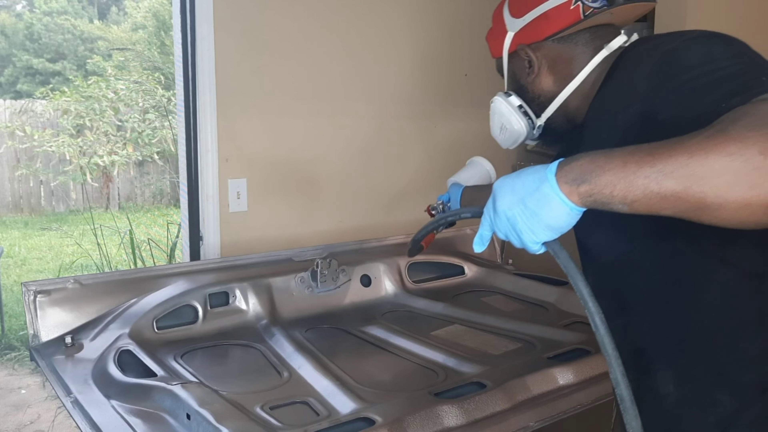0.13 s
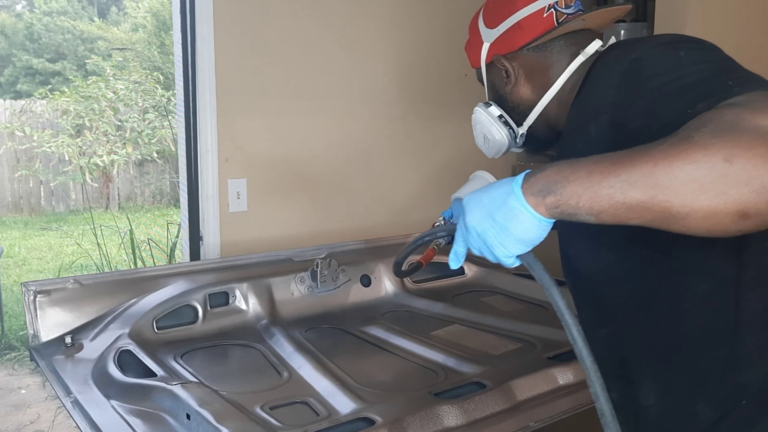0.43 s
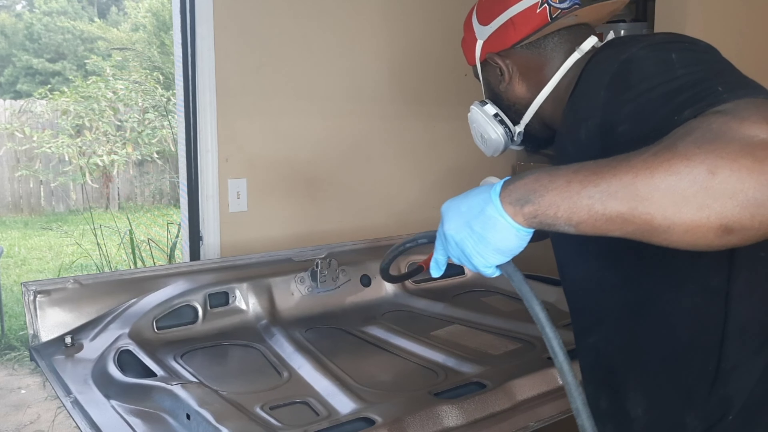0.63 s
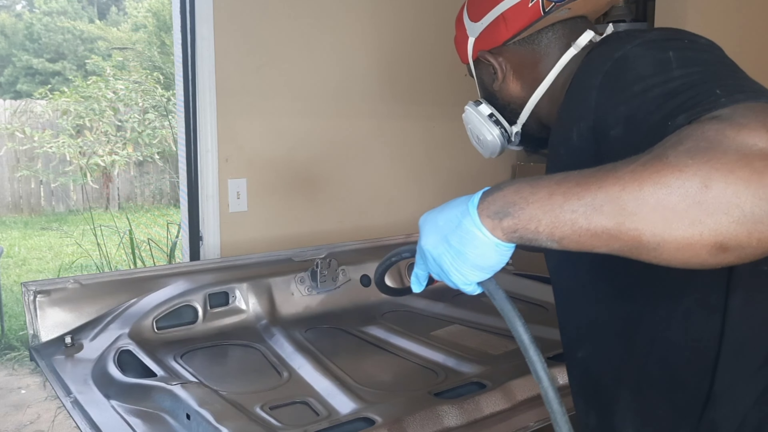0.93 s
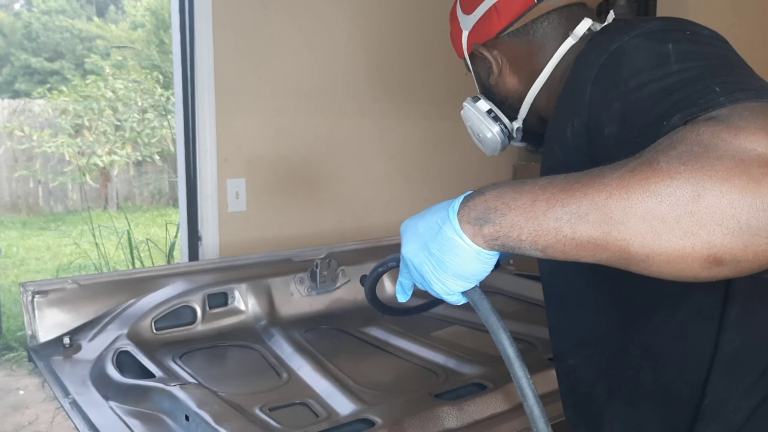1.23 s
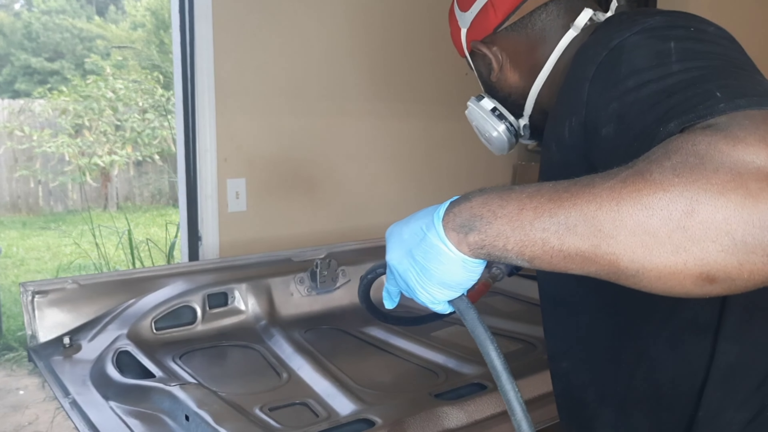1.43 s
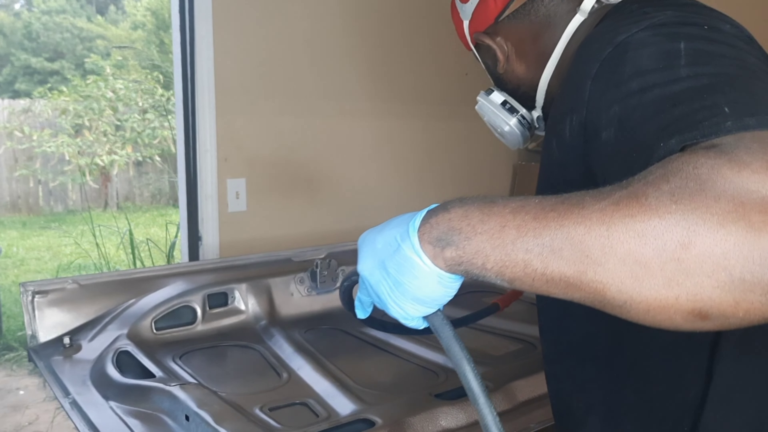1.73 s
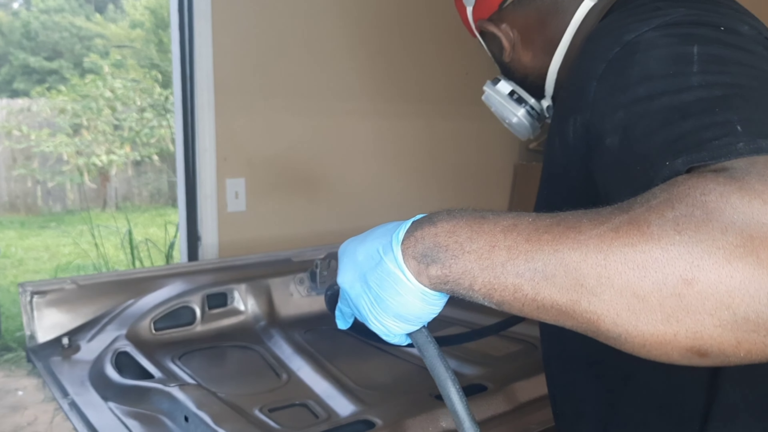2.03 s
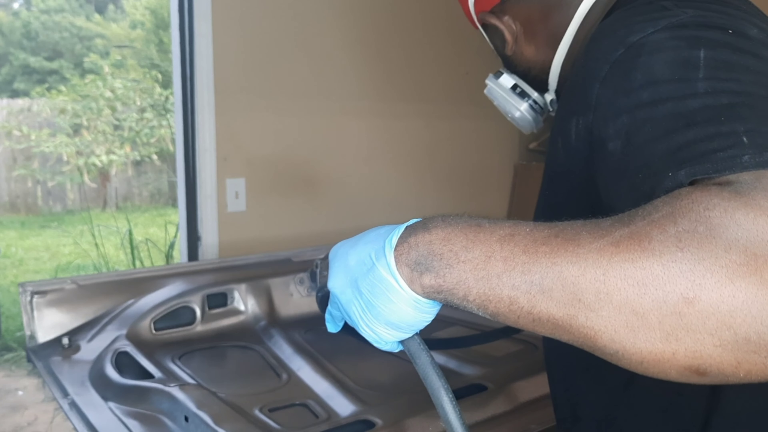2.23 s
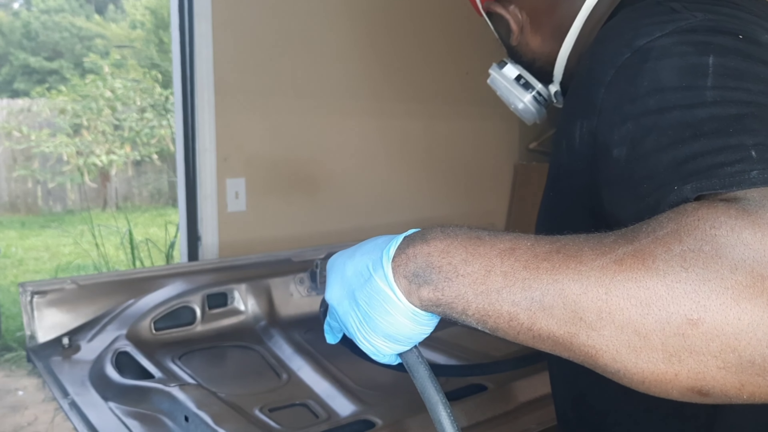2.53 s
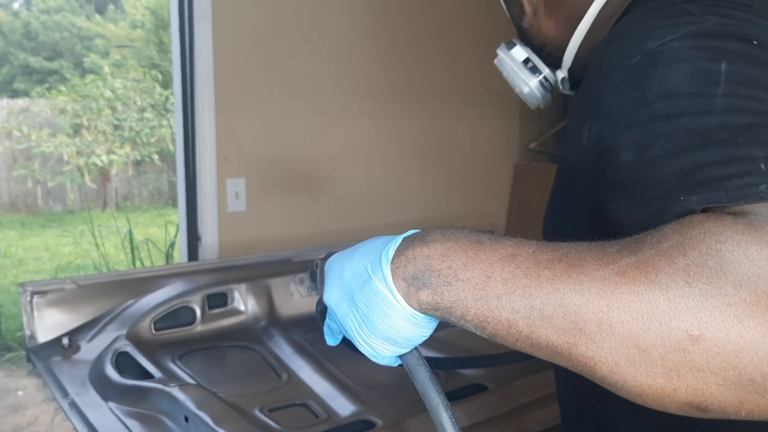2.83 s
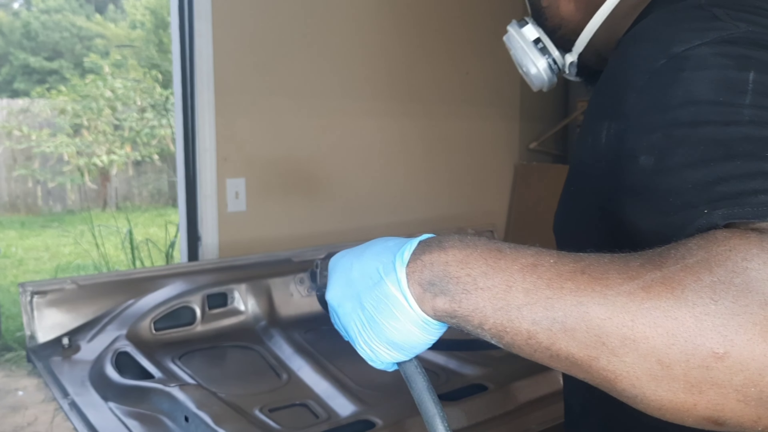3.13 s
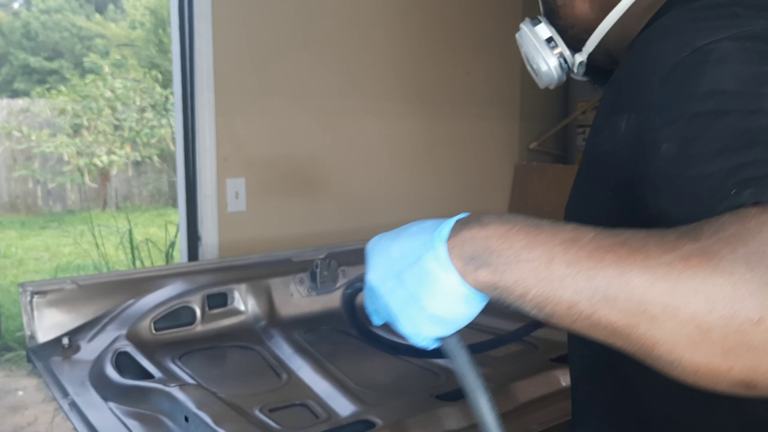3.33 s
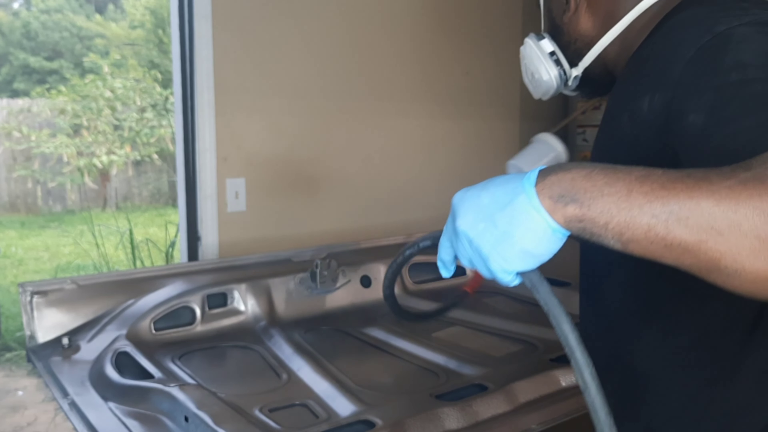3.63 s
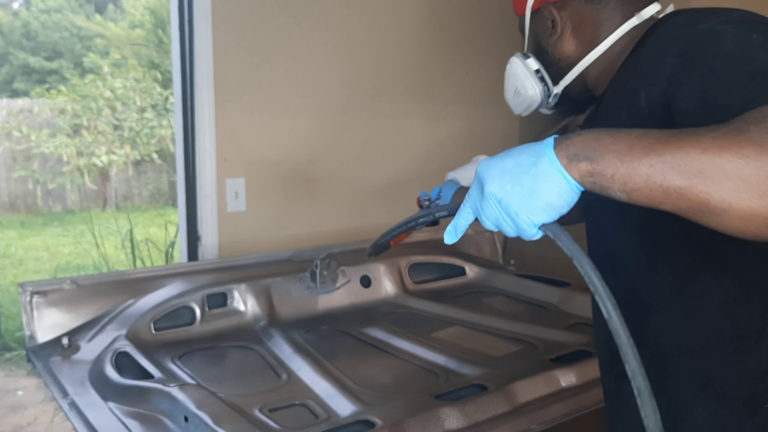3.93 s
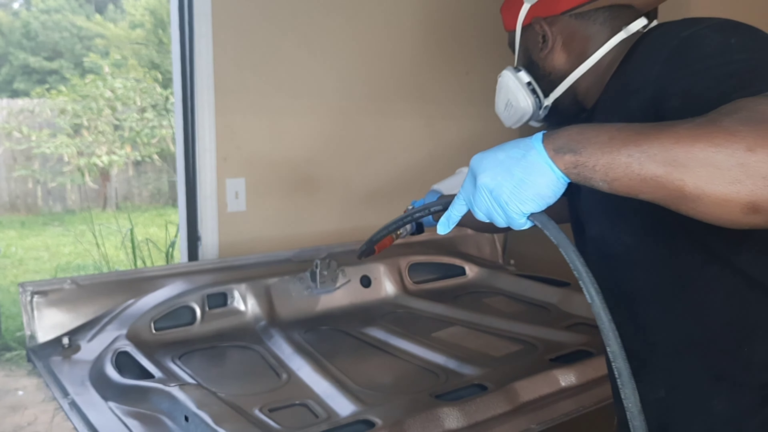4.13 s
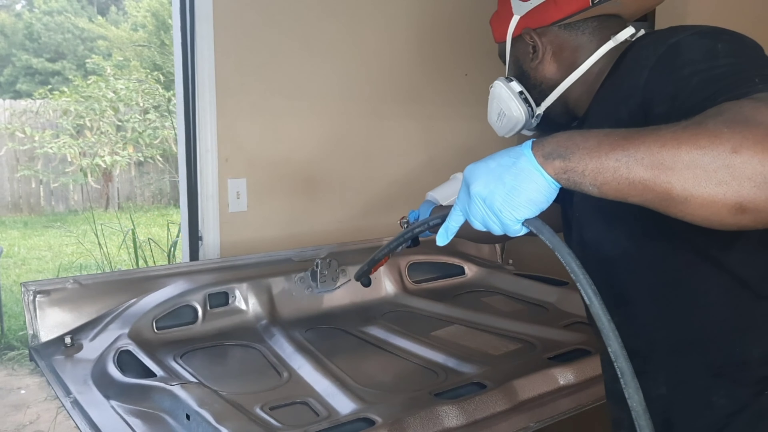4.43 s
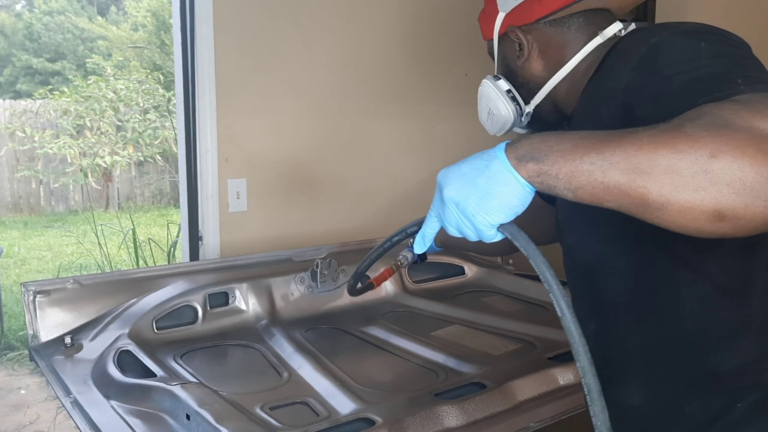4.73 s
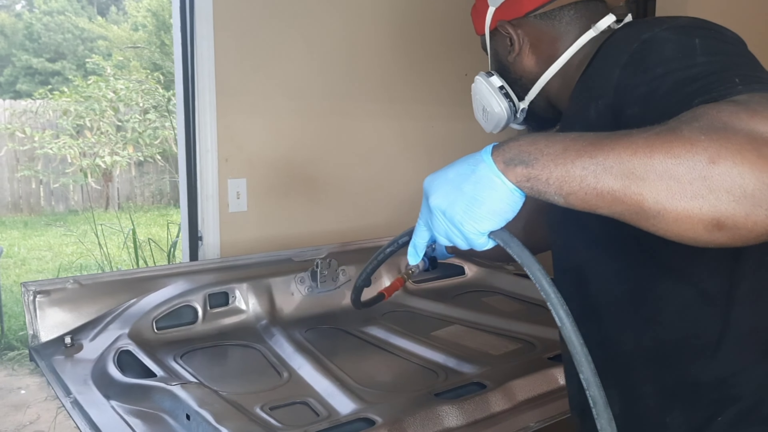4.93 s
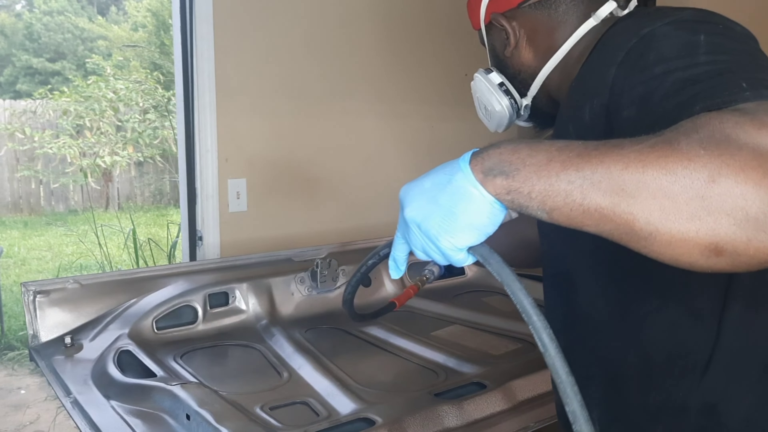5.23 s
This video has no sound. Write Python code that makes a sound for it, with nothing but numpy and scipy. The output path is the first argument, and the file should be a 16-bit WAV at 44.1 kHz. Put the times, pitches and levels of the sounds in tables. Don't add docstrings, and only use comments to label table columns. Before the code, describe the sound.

A belt-driven air compressor clatters and drones steadily in an open garage while a nearby spray gun hisses in two long bright passes.

```python
import sys
import numpy as np
from scipy import signal
from scipy.fft import rfft, irfft, next_fast_len
from scipy.io import wavfile

SR = 44100
rng = np.random.default_rng(int(sys.argv[2]) if len(sys.argv) > 2 else 0)


def voltage_ratio(decibels):
    exponent = np.asarray(decibels, float) / 20
    return 10 ** exponent


def master(y):
    cut = np.clip(np.atleast_2d(y).T, -1, 1)
    pcm = np.round(cut * 32767)
    wavfile.write(sys.argv[1], SR, pcm.astype(np.int16))


N = 429975

CRANK_HZ = 19.6140
CUTOFF_HZ = 15730

# opens_s, shuts_s, jet_db, burst_db
TRIGGER_PULLS = [
    (-0.1, 2.745, 1.1, -7),
    (3.999, 7.19, 1, 1.5),
]


def at_hz(points, hz):
    grid, *columns = np.transpose(points)
    return np.array([np.interp(np.log(hz + 1), np.log(grid), column) for column in columns])


def drift(rate_hz):
    smoothing = np.exp(-200 * np.pi * rate_hz / SR)
    noise = rng.standard_normal(N // 100 + 2002)
    slow = signal.lfilter([1], [1, -2 * smoothing, smoothing ** 2], noise)[2000:]
    return np.interp(np.arange(N) / 100, np.arange(len(slow)), slow / slow.std())


def air(spectrum, peaks, ripple_db, splits):
    size = next_fast_len(N)
    hz = np.fft.rfftfreq(size, 1 / SR)
    left_db, right_db, alike = at_hz(spectrum, hz)
    alike = np.clip(alike, 0, 1)
    mid, side = rfft(rng.standard_normal((2, size)))
    pair = np.sqrt(1 + alike) * mid + np.sqrt(1 - alike) * side * [[1], [-1]]

    ripple = [np.interp(hz, np.arange(400) * 60.0, row) for row in rng.standard_normal((2, 400))]
    level_db = np.array([left_db, right_db]) + ripple_db * np.array(ripple) * (hz > 600)
    for centre, width, *peak_db in peaks:
        level_db = level_db + np.outer(peak_db, 1 / (1 + (2 * (hz - centre) / width) ** 2))
    coloured = pair * voltage_ratio(level_db) * np.sqrt(SR / 4)

    place = np.interp(np.log(hz + 1), np.log(splits), np.arange(len(splits)))
    bands = []
    for k in range(len(splits)):
        share = np.sqrt(np.clip(1 - abs(place - k), 0, 1))
        bands.append(irfft(coloured * share, size)[:, :N])
    return bands


def loudness_beats(lines):
    power = abs(np.fft.ifft(lines, 64)) ** 2
    return rfft(power)[:, 1:] / power.sum(axis=1, keepdims=True)


def beat_phases(lines, count=2000):
    swells = [(21, 0.01, 0.44, 0.44, 0.33), (29, 0.28, 0.77, 0.1, 0.38), (37, 0.37, 0.63, 0.14, 0.13),
              (43, 0.42, 0.64, 0.25, 0.21), (48, 0.55, 0.54, 0.29, 0.01), (53, 0.25, 0.12, 0.33, 0.44),
              (59, 0.43, 0.73, 0.12, 0.25), (66, 0.05, 0.83, 0.53, 0.37), (73, 0.1, 0.78, 0.07, 0.47),
              (81, 0.12, 0.89, 0.36, 0.1), (104, 0.27, 0.78, 0.12, 0.49)]
    phase, low = rng.uniform(0, 2 * np.pi, len(lines)), 13
    for top, once, once_at, twice, twice_at in swells:
        near = max(top - 24, 13)
        tries = np.tile(phase[near:top], (count, 1))
        tries[:, low - near:] = rng.uniform(0, 2 * np.pi, (count, top - low))
        trial = lines[near:top] * np.exp(1j * tries)
        wanted = np.array([once, twice]) * np.exp(-2j * np.pi * np.array([once_at, 2 * twice_at]))
        miss = (abs(loudness_beats(trial[:, low - near:])[:, :2] - wanted) ** 2).sum(axis=1)
        rattle = (abs(loudness_beats(trial)[:, 2:]) ** 2).sum(axis=1)
        phase[near:top] = tries[np.argmin(miss + .12 * rattle)]
        low = top
    return phase


def crank(count=6, size=2 ** 14):
    # order, left_db,
    # right_db, left_lead_rad
    strong_orders = [(2, -66, -67, -0.0), (3, -56, -56, 0.0), (4, -48, -48, -0.3), (5, -65, -70, 0.0),
                     (6, -52, -46, -0.2), (7, -68, -67, -0.2), (8, -51, -52, -0.1), (9, -73, -77, -0.0),
                     (10, -69, -72, 0.5), (11, -64, -67, 0.0), (12, -50, -52, 0.2), (13, -57, -63, 0.6),
                     (14, -49, -56, -1.8), (15, -51, -57, 0.1), (16, -44, -41, -0.2), (17, -56, -68, -0.1),
                     (18, -34, -36, -0.2), (19, -63, -90, 1.0), (20, -49, -52, -0.1), (21, -54, -54, -0.2),
                     (22, -51, -52, -0.6), (23, -49, -52, -0.5), (24, -44, -49, 0.3), (25, -36, -44, 0.2),
                     (26, -41, -51, 2.6), (27, -67, -57, -2.1), (28, -52, -56, -1.0), (29, -54, -53, 0.1),
                     (30, -48, -51, -1.6), (31, -48, -52, 2.4),
                     (32, -43, -46, -0.7), (33, -48, -49, -0.7), (34, -46, -49, -1.4), (35, -49, -54, -1.2),
                   (36, -51, -37, 1.0), (37, -49, -51, -0.9), (38, -36, -37, -0.9), (39, -41, -45, -2.1),
                   (40, -38, -43, -1.4), (41, -38, -48, -1.9), (42, -48, -45, -2.0), (43, -53, -53, 1.3),
                   (44, -46, -39, 1.1), (45, -33, -36, -0.8), (46, -36, -37, 0.0), (47, -41, -46, -0.8),
                   (48, -37, -43, -0.6), (49, -28, -38, -1.0), (50, -29, -44, 1.1), (51, -42, -53, 3.0),
                   (52, -48, -41, 2.2), (53, -46, -50, -1.5), (54, -35, -47, -2.0), (55, -41, -45, 1.9),
                   (56, -40, -40, -1.9), (57, -45, -54, 0.2), (58, -44, -43, 3.1), (59, -43, -44, -1.6),
                   (60, -41, -43, -2.3), (61, -38, -41, -2.1),
                     (62, -38, -48, -1.5), (63, -34, -46, -2.7), (64, -70, -44, -2.0), (65, -44, -38, -1.1),
                   (66, -47, -46, 1.9), (67, -36, -39, -2.5), (68, -46, -55, -2.2), (69, -46, -51, -2.9),
                   (70, -38, -45, -2.5), (71, -58, -45, 0.9), (72, -44, -47, 0.4), (74, -36, -42, 2.7),
                   (75, -45, -51, 2.5), (77, -39, -45, 1.5), (83, -44, -55, -0.5), (85, -45, -55, 0.8),
                   (87, -44, -47, -2.3), (89, -47, -47, -1.9), (91, -48, -55, -3.0), (96, -45, -57, -0.6),
                   (97, -48, -49, 1.6), (101, -50, -54, -2.3), (102, -56, -48, 2.5), (115, -51, -56, 0.6),
                   (117, -48, -54, 0.9), (118, -49, -56, 0.4), (119, -51, -47, 1.3), (125, -52, -62, 1.2),
                   (129, -43, -51, -0.3), (133, -50, -61, -0.5)]
    # pitch_hz, left_db, right_db
    knock_levels = [(644, -39.5, -42.5), (1010, -45.5, -45), (1310, -53, -56), (1540, -58.5, -59.5),
                    (1950, -54, -51), (2440, -54.5, -63.5), (3160, -69, -85), (4130, -62.5, -62),
                    (5700, -73, -67), (8100, -70, -66.5), (10100, -70.5, -85), (12000, -75.7, -77.5),
                    (15000, -77, -77)]
    # time_s, level_db
    body_shade = [
        (0, -4),
        (1, -2),
        (5, -1),
        (6.2, -0.5),
        (9.75, 0),
    ]
    shaded_order = 49

    orders = np.arange(size // 2 + 1)
    order_hz = orders * CRANK_HZ
    scatter = rng.exponential(1, (2, len(orders))) ** 0.65
    strength = voltage_ratio(at_hz(knock_levels, order_hz)) * scatter * (order_hz < CUTOFF_HZ)
    strength[:, :2] = 0
    lead = rng.uniform(0, 2 * np.pi, len(orders))
    for order, left_db, right_db, rad in strong_orders:
        strength[:, round(order)] = voltage_ratio(np.array([left_db, right_db]))
        lead[round(order)] = rad
    lines = strength * np.exp(1j * np.array([lead, 0 * lead]))
    phase = beat_phases(lines.sum(axis=0))

    turns = CRANK_HZ * np.arange(N) / SR + .0005 * drift(0.33)
    group = rng.integers(0, count, len(orders))
    group[shaded_order] = count
    shade_db = np.interp(np.arange(N) / SR, *np.transpose(body_shade))
    out = 0
    for k in range(count + 1):
        turn = irfft(lines * np.exp(1j * phase) * (group == k), size) * size / np.sqrt(2)
        at = ((turns + 0.00014 * drift(1.5)) % 1 * size).astype(int) % size
        out = out + voltage_ratio(0.86 * drift(0.93) + shade_db * (k == count)) * turn[:, at]
    return out


def rush():
    # pitch_hz, left_db_per_hz, right_db_per_hz, left_right_likeness (0-1)
    rush_colour = [(40, -80, -86, 0.66), (80, -74.5, -70.6, 0.9), (139, -76, -80, 0.7),
                   (200, -65.5, -77, 0.9), (264, -66.5, -71, 0.9), (350, -68, -66.5, 0.83),
                   (690, -67, -67.5, 0.27), (940, -72, -68.5, 0), (1380, -72.5, -72, 0),
                   (2950, -76, -75.5, 0.09), (5370, -83.5, -80.5, 0), (9500, -80, -85.5, 0.11),
                   (11600, -81, -85, 0), (15000, -86.5, -86, -0.09)]
    # pitch_hz, width_hz, left_db, right_db
    rush_peaks = [(202, 21, -10.5, -16), (326, 5.7, 15, 8.5), (511, 41, 12, 6.5), (1316, 51, 8, 13),
                  (1560, 130, -2.5, -3), (3400, 190, -2, -2), (2170, 220, -3, -4), (2330, 114, 7.5, 9),
                  (2540, 120, 1, 2), (655, 40, 6, 7), (2690, 290, -1.5, 0.5), (834, 79, -6, -12),
                  (3830, 330, 3.5, -1.5), (6400, 240, 3.5, 4.5), (6890, 320, -5, 6), (8460, 500, -0.5, 7.5),
                  (9600, 230, 6, 3), (10400, 530, 3.5, 0), (12500, 300, 5, 4), (12850, 250, 4, 4),
                  (13480, 200, 6, 4), (15550, 300, -1, 2)]
    slow_swell_hz, slow_swell_start_rad = 2.28, 4.6
    bands = air(rush_colour, rush_peaks, ripple_db=3.5, splits=[600, 2200, 5000, 11000])
    angle = 2 * np.pi * slow_swell_hz * np.arange(N) / SR + slow_swell_start_rad + .3 * drift(0.38)
    slow_swell = np.cos(angle) + 0.51 * drift(6.9)
    swell_db = [0.1, 0.48, 0.99, 0.32]
    return sum(band * voltage_ratio(db * slow_swell + 0.27 * drift(19.0)) for band, db in zip(bands, swell_db))


def motor():
    # pitch_hz, level_db
    motor_tones = [(57.7, -65), (84.0, -63), (120.0, -58), (140.0, -64), (154.0, -58), (159.1, -63),
                   (168.0, -64), (173.0, -63), (182.0, -60), (238.0, -55), (240.0, -53), (266.0, -59),
                   (280.0, -58), (500.2, -50), (3607, -59), (3881, -59), (9647, -59), (13464, -67)]
    out = 0
    waver_s = np.arange(N) / SR + 3e-5 * drift(1.7)
    for (hz, db), start in zip(motor_tones, rng.uniform(0, 2 * np.pi, len(motor_tones))):
        side_shift = np.array([[0], [hz / 2500]])
        out = out + np.sqrt(2) * voltage_ratio(db) * np.cos(2 * np.pi * hz * waver_s + start + side_shift)
    return out


def pull_strengths():
    rise_s = 0.0077
    jet_sag_db_per_s, shut_s, tail_db, tail_db_per_s = 0.7, 0.027, -19, 210
    burst_hold_s, burst_hold_sag_db, burst_fall_db_per_s = .036, 4.5, 230
    t, jet, burst = np.arange(N) / SR, 0, 0
    for opens, shuts, jet_db, burst_db in TRIGGER_PULLS:
        opening = np.clip((t - opens) / rise_s, 0, 1) ** 2
        closing_db = tail_db * np.clip((t - shuts) / shut_s, 0, 1)
        room_db = -tail_db_per_s * np.maximum(t - shuts - shut_s, 0)
        sag_db = jet_sag_db_per_s * (t - opens)
        jet = jet + opening * voltage_ratio(jet_db - sag_db + closing_db + room_db)

        since = t - opens - rise_s
        spent_db = burst_hold_sag_db * np.clip(since / burst_hold_s, 0, 1)
        spent_db = spent_db + burst_fall_db_per_s * np.maximum(since - burst_hold_s, 0)
        burst = burst + opening * voltage_ratio(burst_db - spent_db)
    return jet, burst


def spray_gun():
    # pitch_hz, left_db_per_hz, right_db_per_hz, left_right_likeness (0-1)
    jet_colour = [(1500, -81, -97, 0.2), (3000, -77.5, -87.5, 0.3), (5530, -83, -83.5, 0.04),
                  (8640, -81, -81, 0), (9200, -84, -92, 0), (11000, -77, -88, 0), (13600, -75, -75, 0),
                  (15000, -72.5, -82, 0), (15800, -75.5, -77, 0)]
    # pitch_hz, left_db_per_hz, right_db_per_hz, left_right_likeness (0-1)
    burst_colour = [(1200, -95, -93, .1), (2700, -69, -68, .1), (4000, -65, -68, 0),
                    (5700, -66.5, -63.5, 0), (8400, -67, -58, 0), (9300, -68, -66, 0),
                    (10800, -58.5, -67, 0), (14300, -56, -61, 0.1), (15800, -62, -63, 0)]
    jet_bands = air(jet_colour, [], ripple_db=1.0, splits=[5000, 9000, 14000])
    jet = sum(band * voltage_ratio(.5 * drift(4.0)) for band in jet_bands)
    burst = air(burst_colour, [], ripple_db=4.5, splits=[8000])[0]
    jet_gain, burst_gain = pull_strengths()
    return jet * jet_gain * voltage_ratio(0.57 * drift(4.4)) + burst * burst_gain * voltage_ratio(.8 * drift(60.0))


def trigger():
    snap_band = [2300, 10000]
    delay_s, snap_db, fade_60db_s = 0.012, -21, .014
    t, snap = np.arange(N) / SR, 0
    for opens, *_ in TRIGGER_PULLS:
        since = t - opens - delay_s
        snap = snap + (since > 0) * voltage_ratio(snap_db - 60 * np.maximum(since, 0) / fade_60db_s)
    band_pass = signal.butter(2, snap_band, "band", fs=SR, output="sos")
    return signal.sosfilt(band_pass, snap * rng.standard_normal((2, N)) + 1e-18)


def gain_control():
    duck_db, creep_db, rise_db_per_s = -2.5, .6, .07
    attack_s, hold_s, release_s = 0.023, 1.11, .27
    extra_duck_db = [-.5, 0]
    t = np.arange(N) / SR
    gain_db = rise_db_per_s * (t - 3.0)
    for (opens, *_), extra_db in zip(TRIGGER_PULLS, extra_duck_db):
        times = opens + np.cumsum([0, attack_s, hold_s, release_s])
        lowest_db = duck_db + extra_db
        gain_db = gain_db + np.interp(t, times, [0, lowest_db, lowest_db + creep_db, 0])
    return voltage_ratio(gain_db)


def scene():
    return crank() + rush() + motor() + spray_gun() + trigger()


def low_pass(x):
    return signal.sosfilt(signal.butter(12, 16430, fs=SR, output="sos"), x)


def record(dry):
    bass_cut = signal.butter(2, 32, "high", fs=SR, output="sos")
    top_cut = signal.ellip(16, .3, 90, CUTOFF_HZ, fs=SR, output="sos")
    heard = signal.sosfilt(bass_cut, dry)
    mix = signal.sosfilt(top_cut, heard * gain_control())
    return low_pass(mix)


dry = scene()
out = record(dry)
master(out)
```